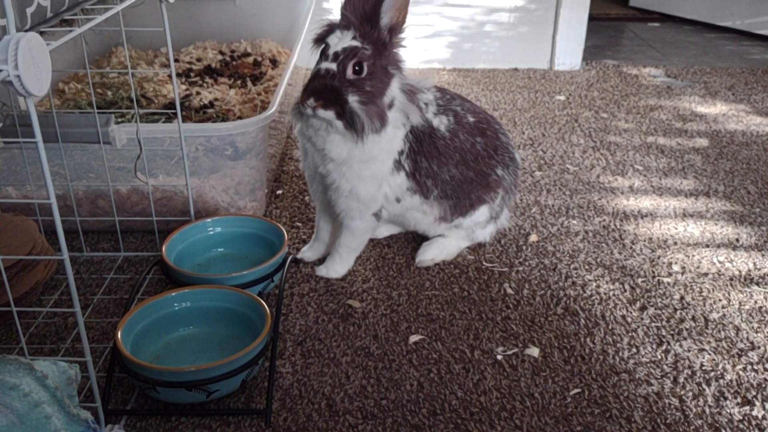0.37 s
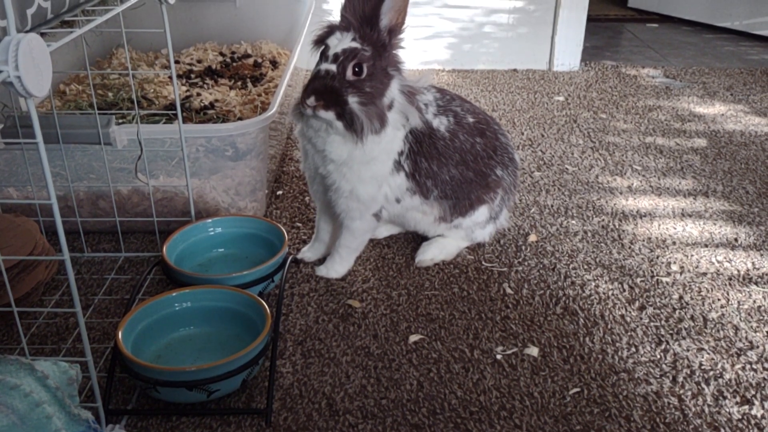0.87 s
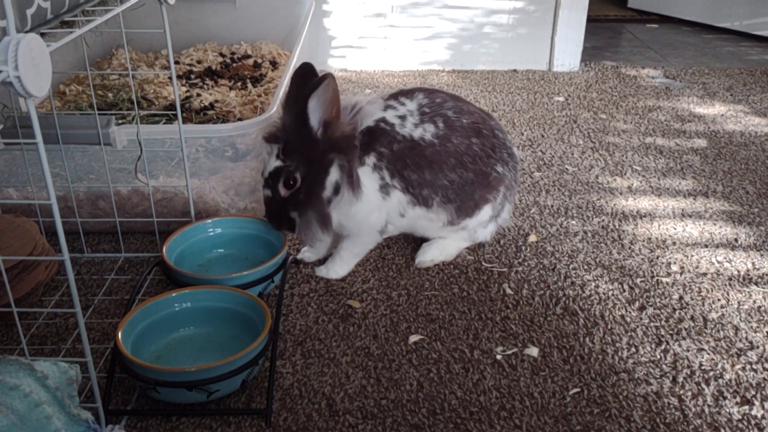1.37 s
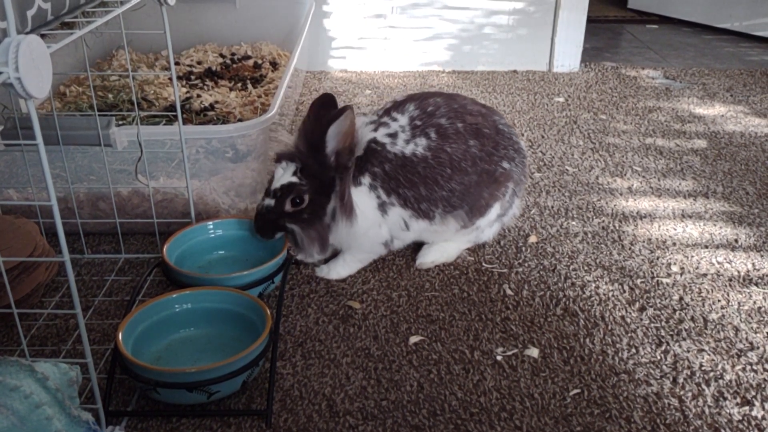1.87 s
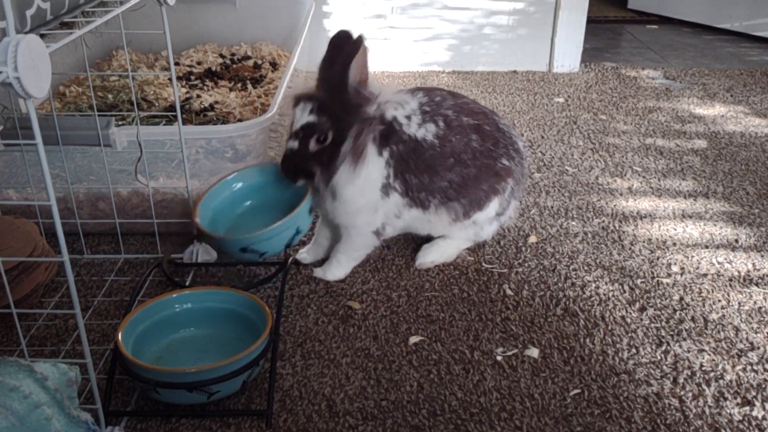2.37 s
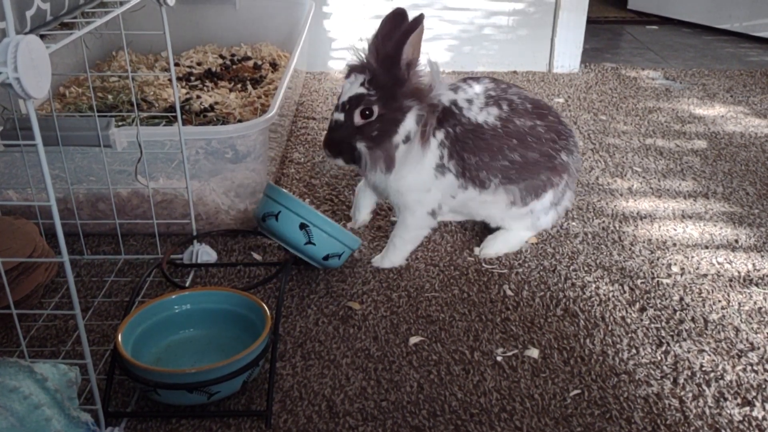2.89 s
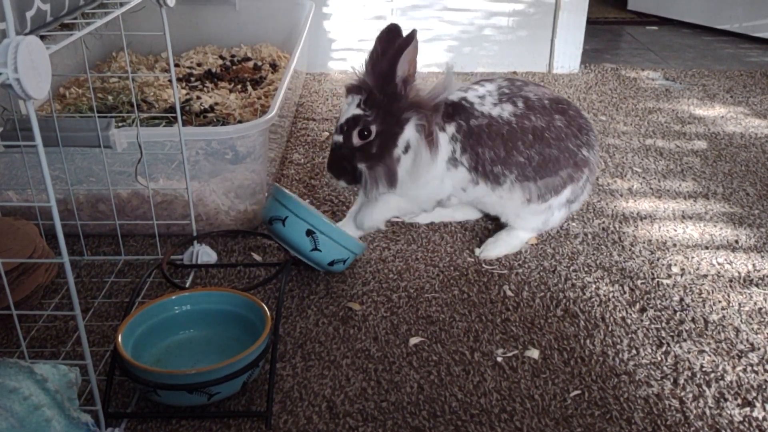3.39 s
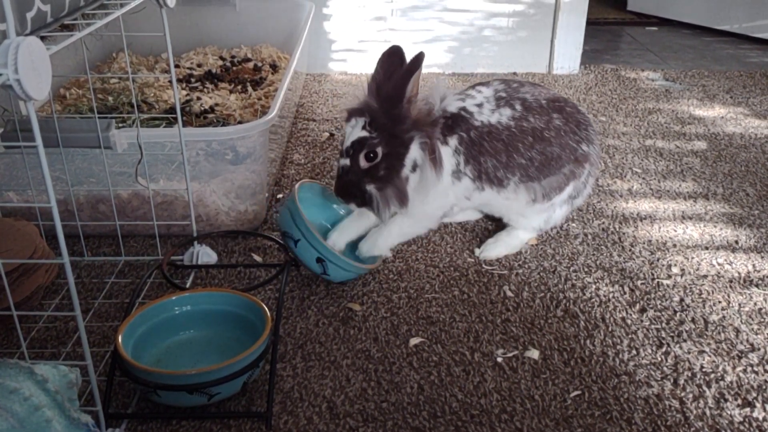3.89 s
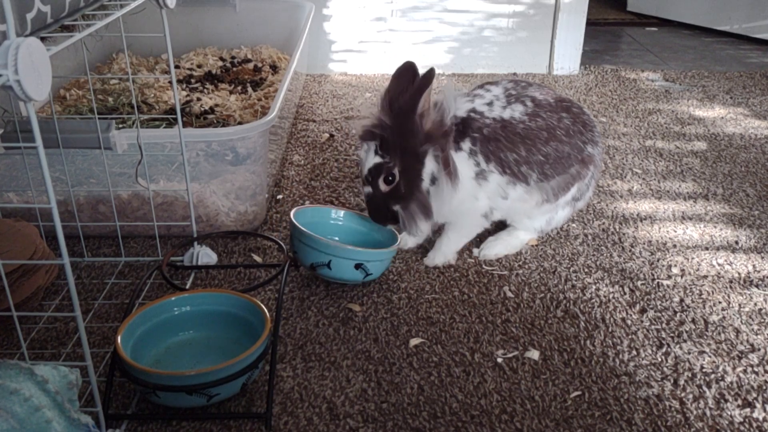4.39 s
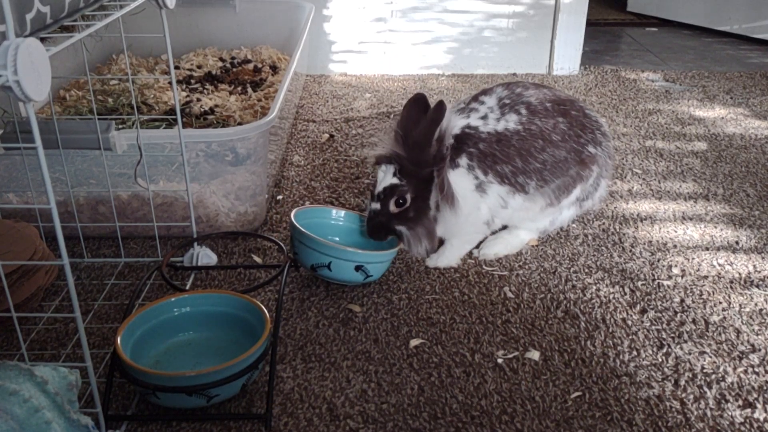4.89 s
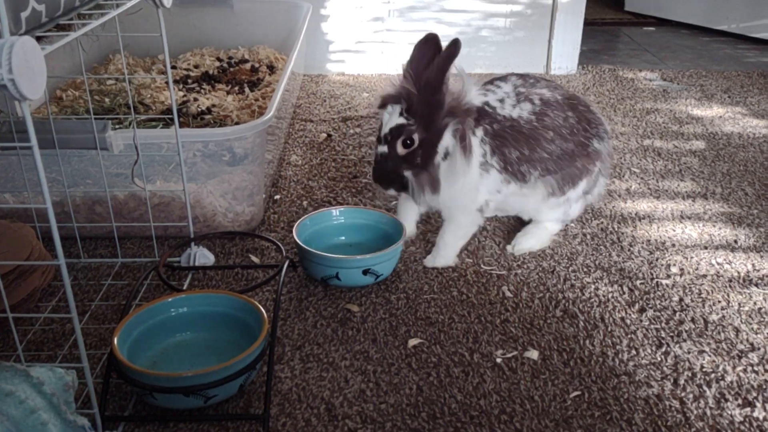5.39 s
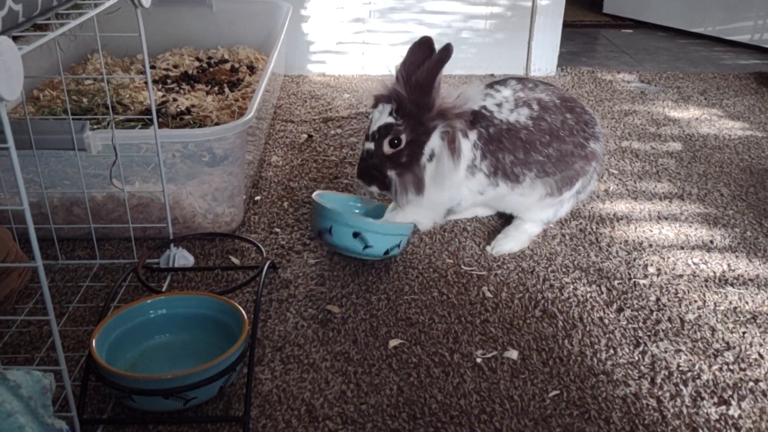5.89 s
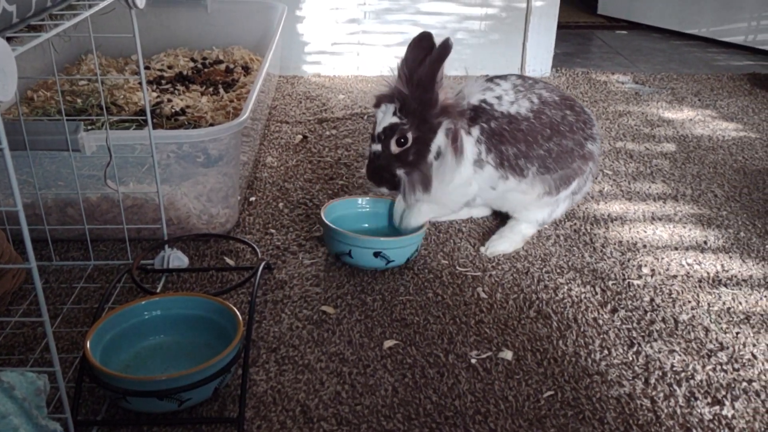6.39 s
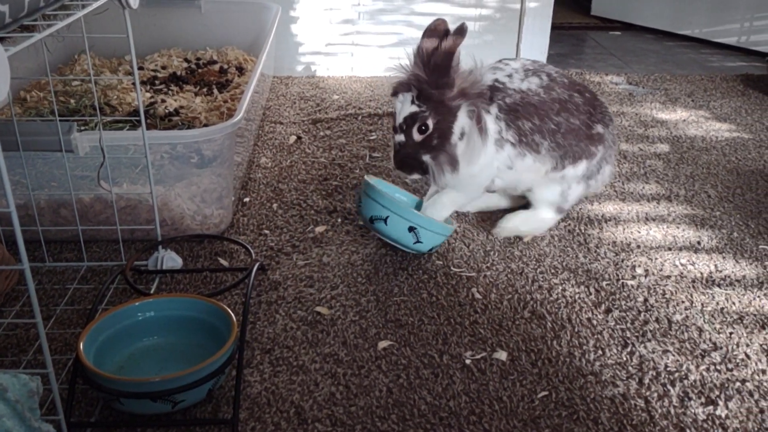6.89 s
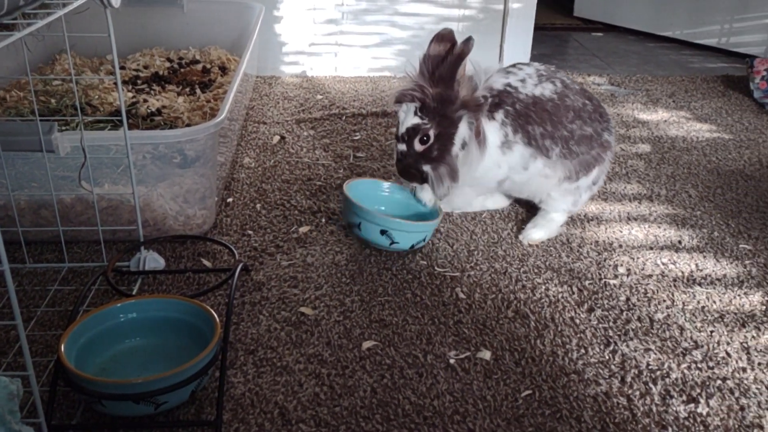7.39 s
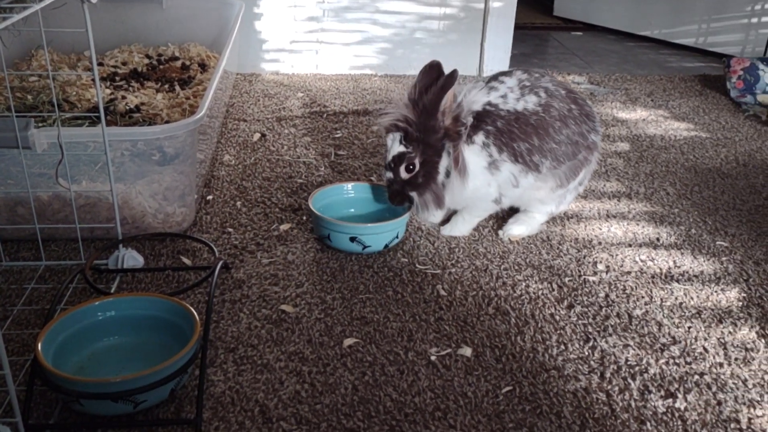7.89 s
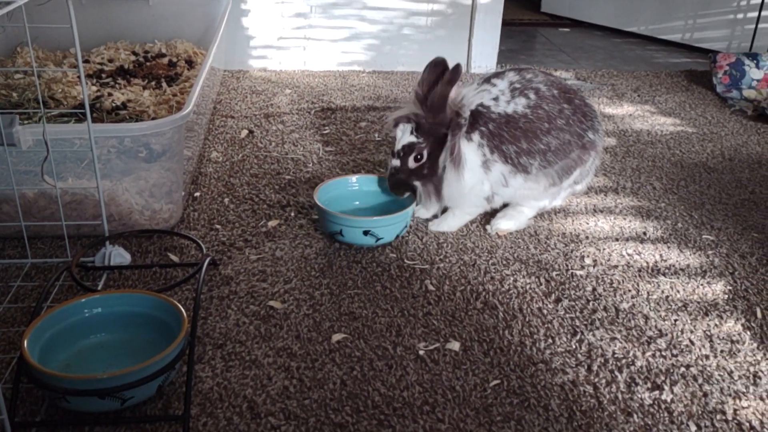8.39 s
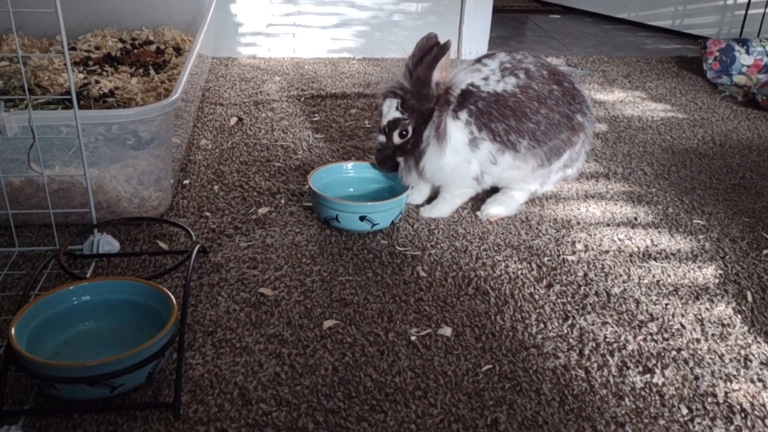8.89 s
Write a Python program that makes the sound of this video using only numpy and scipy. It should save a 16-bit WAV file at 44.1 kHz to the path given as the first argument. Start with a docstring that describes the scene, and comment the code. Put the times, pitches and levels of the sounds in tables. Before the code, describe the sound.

Soft handling rumble and faint wire rattles, then sharp ceramic-on-wire clanks, ringing clinks, and quiet taps and furry rustling on carpet.

```python
"""First a quiet room, a grip rumbling on a handheld microphone pair, fur rustling and wires being brushed.
Then a rabbit lifts a ceramic bowl off its wire stand, drops it against the wires and paws it over a carpet.
The bowl and wires are decaying resonances; thuds, fur and paws are shaped noise; a small room answers the knocks.
A hand half covers the left port, and fingers thump on the case as short pressure swings."""
import sys
import numpy as np
from scipy import signal
from scipy.fft import rfft, irfft, next_fast_len
from scipy.io import wavfile
from scipy.ndimage import uniform_filter1d, map_coordinates

SR = 44100
rng = np.random.default_rng(int(sys.argv[2]) if len(sys.argv) > 2 else 0)


def volts_from_db(level):
    """Convert decibel levels to linear amplitude ratios."""
    exponent = np.asarray(level, float) / 20
    return 10 ** exponent


def store_wav(level_fs):
    """Save 16-bit WAV to argv[1]."""
    pcm = np.round(np.clip(np.atleast_2d(level_fs), -1, 1) * 32767)
    wavfile.write(sys.argv[1], SR, pcm.T.astype(np.int16))


N = 397341
FAR_STAND_DB = -92  # wire clatter of a knock away from the stand


def unit(x):
    """Scales a sound to rms 1."""
    return x / np.sqrt(np.mean(x ** 2) + 1e-20)


def along(points, hz):
    """Reads a curve of (Hz, value) points on a log frequency axis."""
    point_hz, value = np.transpose(points)
    return np.interp(np.log(hz + 1), np.log(point_hz + 1), value)


def curves(rows, t=None):
    """Joins the rows into one smooth value per moment for each column after the time."""
    if t is None:
        t = np.arange(N) / SR
    start_s, *columns = np.transpose(rows)
    return [np.interp(t, start_s, column) for column in columns]


def wobble(rate):
    """A smooth random curve with rate knots a second."""
    knots = rng.standard_normal(int(N * rate / SR) + 4)
    return map_coordinates(knots, [np.arange(N) * rate / SR])


def filtered(x, response):
    """Multiplies the spectrum of x by a response that depends on frequency."""
    n = x.shape[-1]
    size = next_fast_len(n + 8192)  # spare room for the filter's tail
    return irfft(rfft(x, size) * response(np.fft.rfftfreq(size, 1 / SR)), size)[..., :n]


def coloured(x, spectrum):
    """Shapes x with a table of (Hz, dB)."""
    return filtered(x, lambda hz: volts_from_db(along(spectrum, hz)))


def noise(spectrum):
    """Two unrelated noises of one colour, rms 1 each."""
    pair = coloured(rng.standard_normal((2, N)), spectrum)
    return pair / pair.std(axis=1, keepdims=True)


def split(pan_db):
    """Left and right gains for a left-right difference, their mean 1."""
    return 2 / (1 + np.array([volts_from_db(-pan_db), volts_from_db(pan_db)]))


# how long the room echoes: pitch_hz, t60_s (time to fall by 60 dB)
ECHO_TIMES = [(200, 0.65), (1500, 0.17), (5000, 0.28), (12000, 0.1)]


def room(x, wet_db):
    """Adds a diffuse tail of fading noise, different at each port, to the direct sound."""
    hz, t, grains = signal.stft(rng.standard_normal((2, SR // 3)), SR, nperseg=256)
    fade = volts_from_db(-60 * t / along(ECHO_TIMES, hz)[:, None])
    tail = signal.istft(grains * fade, SR, nperseg=256)[1]
    tail = np.pad(tail / np.linalg.norm(tail[0]), ((0, 0), (130, 0)))  # the tail waits 3 ms
    wet = signal.fftconvolve(x[None], tail, axes=1)[:, :len(x)]
    return x + volts_from_db(np.reshape(wet_db, (-1, 1))) * wet


# colour of the room tone: pitch_hz, density_db (per Hz)
ROOM_TONE = [(80, -41), (150, -14.5), (300, -5), (356, -2), (420, -8), (600, -18), (1200, -21),
             (3000, -31.5), (6000, -120)]
# colour of a steady narrow hiss: pitch_hz, density_db (per Hz)
THIN_HISS_COLOUR = [(4600, -120), (5300, -4.5), (6000, 1), (6700, -5.5), (7600, -120)]
# strength of that hiss, one row for left and one for right: level_db
THIN_HISS_LEVELS = [
    [-93],
    [-83],
]


def background():
    """Low room tone and a thin hiss, both steady noise."""
    return volts_from_db(-79) * noise(ROOM_TONE) + volts_from_db(THIN_HISS_LEVELS) * noise(THIN_HISS_COLOUR)


# slips of the fingers on the case: start_s, level_db, pitch_hz, direction (push 1, pull -1)
FINGER_SLIPS = [(0.8784, -45, 190, -1), (0.894, -33, 138, 1), (0.918, -29, 107, -1),
                (1.2356, -41.5, 118, 1), (2.2787, -34, 145, -1), (2.3982, -44, 142, -1),
                (2.42, -43, 144.8, -1), (2.602, -47, 144, 1), (3.228, -37, 149, 1), (4.6056, -25, 354, 1),
                (4.63, -32.5, 290, 1), (4.7, -45.5, 135.2, -1), (4.8225, -39, 152, -1),
                (4.8574, -28.5, 181.4, 1), (4.993, -45.5, 190, 1), (5.104, -40, 133, 1),
                (5.1752, -40, 118, -1), (5.194, -40.5, 192.3, 1), (5.3155, -28, 146, 1),
                (5.3475, -20.5, 108, 1), (5.3537, -21, 95, -1), (5.367, -25.5, 123, -1),
                (5.3834, -28, 134, 1), (6.4902, -45, 310, 1), (6.5287, -44.5, 191, 1), (6.552, -37, 272, 1),
                (6.584, -40.5, 277, 1), (6.6175, -39.5, 290, 1), (6.649, -43, 233, 1),
                (6.6693, -42.5, 232, 1), (6.792, -30, 137, -1), (6.8345, -36, 132, -1),
                (6.8776, -43.5, 120, -1), (6.949, -42.5, 240, 1), (6.969, -43, 114, -1),
                (7.102, -41.5, 124, -1), (7.704, -52, 237, 1), (8.8897, -41.5, 325, -1)]
# the resting grip: start_s, rumble_db (before the 6 dB added below), left_minus_right_db
GRIP_RUMBLE = [(0.0, -68, 16), (0.6, -73.5, 12), (1.3, -72, 13.5), (2.2, -70.5, 11), (2.66, -66, 11),
               (3.26, -70.5, 13.5), (4.31, -78, 9), (4.62, -66, 10), (4.85, -74, 11.5), (5.24, -62.5, 14.5),
               (5.5, -71, 5), (5.7, -79.5, -1.5), (6.25, -81.5, 6), (6.37, -72, 6), (6.7, -65, -2),
               (6.95, -66.5, -0.5), (7.3, -72.5, 2.5), (8.05, -83.5, -0.5), (9.01, -80.5, -1)]
# colour of the grip rumble: pitch_hz, density_db (per Hz)
RUMBLE_COLOUR = [(15, -43), (25, -12.5), (81, 2), (130, -3), (274, -17.5), (309, -20.5), (382, -27.5),
                 (600, -32.5), (780, -48), (1320, -120)]


def fingers():
    """A slip is one pressure step that swings back and dies in a cycle or two; the grip rumbles beneath."""
    out, shifts, lead = np.zeros((2, N + SR)), 0, SR // 50
    t = (np.arange(SR // 10) - lead) / SR
    for start_s, level_db, hz, direction in FINGER_SLIPS:
        # quick slips are fingertips by the right port, slow ones the palm on the left
        pan_db = -20 if hz > 210 else 20 + (level_db + 45)
        turns = hz * t
        rise = np.exp(-(turns / 0.11) ** 2)
        swing = np.cos(2 * np.pi * turns) * np.exp(-1.2 * np.abs(turns))
        push = np.where(t < 0, rise, swing)
        sides = volts_from_db(level_db + np.minimum([pan_db, -pan_db], 0))[:, None]
        out[:, round(start_s * SR) - lead:][:, :len(t)] += np.sign(direction) * sides * push
        # the grip shifts around each slip, so the rumble swells there
        swell = np.exp(-((np.arange(N) / SR - start_s) / 0.03) ** 2)
        shifts = shifts + volts_from_db(-29.5) * sides * swell
    rumble_db, pan_db = curves(GRIP_RUMBLE)
    lumps = volts_from_db(1.5 * np.array([wobble(22), wobble(22)]) + 1.5 * wobble(5.3))
    rumble = unit(lumps * noise(RUMBLE_COLOUR))
    return out[:, :N] + (volts_from_db(rumble_db + 6) * split(pan_db) + shifts) * rumble


# resonances of the wire stand: pitch_hz, width_hz, level_db
WIRE_RESONANCES = [(236, 111, -12.5), (605, 310, -13), (974, 110, -6.5), (1401, 160, 1.5), (2030, 200, -4),
                   (2184, 200, 3.5), (2440, 1100, -4.5), (3670, 360, -7), (3550, 73, -3), (4220, 96, 2.5),
                   (5850, 170, -6), (6550, 100, -19), (6530, 750, -13.5), (7200, 460, -19.5),
                   (9800, 130, -54)]


def wires(f):
    """Response of the stand: broad resonances that ring only after they are struck."""
    total = 0
    for k, (centre, width, level_db) in enumerate(WIRE_RESONANCES):
        resonance = 1j * f * width / (centre * centre - f * f + 1j * f * width)
        total = total + (-1) ** k * volts_from_db(level_db) * resonance
    return total


# light touches on the stand: start_s, level_db (before the 5.5 dB taken off below), rustle_db (against the shake)
STAND_TOUCHES = [(0.089, -60.5, -7), (0.306, -65, 2.5), (0.564, -54, -4.5), (0.828, -56, 0.5),
                 (1.847, -56.5, -9), (2.033, -59.5, -11), (2.269, -56, -12), (2.966, -51.5, -31)]
# colour of fur, also used for scuffing: pitch_hz, density_db (per Hz)
FUR_COLOUR = [(1500, -120), (2400, -9.5), (4000, -7.5), (5500, -4.5), (6500, 1.5), (8000, -5.5),
              (8700, -12.5), (12000, -14.5), (16000, -14)]


def nudges():
    """A light touch shakes the wires for a moment with a short rustle."""
    out, t = np.zeros((2, N + SR)), np.arange(SR // 2) / SR
    for start_s, level_db, rustle_db in STAND_TOUCHES:
        shake = unit(filtered(rng.standard_normal(len(t)), wires))
        rustle = volts_from_db(rustle_db) * unit(coloured(rng.standard_normal(len(t)), FUR_COLOUR))
        envelope = volts_from_db(level_db - 5.5 - 60 * t / 0.22) * (1 - np.exp(-t / 0.01))
        out[:, round(start_s * SR):][:, :len(t)] += room((shake + rustle) * envelope, wet_db=-2.5)
    return out[:, :N]


# fur against the bowl: start_s, level_db (before the 4 dB left and 9 dB right added below)
FUR_RUSTLE = [(0.0, -93), (1.3, -98), (1.78, -95), (2.01, -80), (2.3, -93), (2.61, -72), (2.8, -83),
              (3.3, -79.5), (4.3, -81), (4.64, -83.5), (5.07, -75.5), (5.3, -82.5), (5.7, -78), (6.25, -83),
              (7.13, -83), (7.45, -75.5), (7.73, -82.5), (8.16, -72), (8.45, -76.5), (8.8, -80.5),
              (9.01, -66.5)]
# paws dragging on the pile: middle_s, half_length_s, level_db
PAW_DRAGS = [(0.87, 0.11, -73), (1.98, 0.14, -69.5), (2.63, 0.033, -55), (2.93, 0.06, -66.5),
             (3.2, 0.28, -72.5), (4.04, 0.16, -70.5), (4.5, 0.22, -69), (5.07, 0.21, -74),
             (5.42, 0.098, -76.5), (6.55, 0.069, -77.5), (9.01, .12, -72.5)]
# colour of the paws: pitch_hz, density_db (per Hz)
PAW_COLOUR = [(200, -120), (400, 6.5), (1000, 1), (2300, 0), (4000, 2.5), (6000, -120)]


def scuffing():
    """Fur brushes the bowl and paws drag on the pile, both as noise in uneven grains."""
    fur_db, = curves(FUR_RUSTLE)
    t = np.arange(N) / SR
    drags = sum(volts_from_db(db) * np.exp(-((t - middle) / half) ** 2) for middle, half, db in PAW_DRAGS)
    fur_grains = volts_from_db(fur_db + np.array([[4], [9]]) + wobble(30) + 1.8 * wobble(280))
    paw_grains = volts_from_db(1.5 * wobble(43) + 2.6 * wobble(180))
    return fur_grains * noise(FUR_COLOUR) + drags * paw_grains * noise(PAW_COLOUR)


# the bowl's weight thuds on the floor: start_s, level_db
FLOOR_THUDS = [(2.55, -41), (2.652, -42), (2.70, -45.5), (2.76, -52)]
# colour of a thud: pitch_hz, density_db (per Hz)
THUD_COLOUR = [(40, -120), (70, -5), (200, 2), (350, -6), (700, -16), (1200, -120)]


def landings():
    """Each thud is a dull burst of noise that swells fast and falls by 60 dB in 0.15 s."""
    t, shape = np.arange(N) / SR, 0
    for start_s, level_db in FLOOR_THUDS:
        since = np.maximum(t - start_s, 0)
        shape = shape + volts_from_db(level_db - 60 * since / 0.15) * (1 - np.exp(-since / 0.003))
    return shape * noise(THUD_COLOUR)[0]


# the bowl hits the stand: start_s, foot_db, low_rim_db, high_rim_db, clatter_db
STAND_HITS = [(1.7573, -74, -87, -72, -88), (1.955, -63, -89, -77, -62), (2.1305, -68, -87, -87, -69),
              (2.2624, -57, -92.5, -84.5, -73.5), (2.4204, -66, -78, -77.5, -60.5),
              (2.4509, -39.5, -75, -62, -45), (2.5032, -49, -71, -61, -73), (2.5334, -14.5, -44, -52, -34),
              (2.5548, -14.5, -37, -51, -32), (2.6519, -14, -32.5, -50, -33),
              (2.6988, -38.5, -40.5, -65.5, -34.5), (3.2081, -43, -59, -44, -67),
              (3.3446, -75, -66.5, -57, -70), (3.4237, -56.5, -78, -59.5, -73),
              (3.493, -44.5, -57, -49, -65.5), (3.5234, -51, -43, -52.5, -50.5),
              (3.5544, -54, -49, -49.5, -61), (3.6061, -56, -39.5, -67, -48), (3.706, -54, -88, -49, -73),
              (3.7743, -49, -70, -49, -68.5), (3.8434, -67, -56.5, -75, -50.5),
              (3.9932, -36, -75.5, -68, -44.5), (4.0098, -33, -81, -61, -75),
              (4.0374, -44.5, -74.5, -49.5, -81), (4.103, -34, -82, -59.5, -46.5),
              (4.1354, -37, -60, -43.5, -74), (4.1586, -39, -62, -53.5, -51),
              (4.2798, -61, -62, -57.5, -82), (4.4049, -13, -38.5, -33.5, -31.5),
              (4.4113, -12, -31, -22, -29), (4.4479, -21, -55, -28, -38),
              (4.5024, -34.5, -35.5, -47.5, -49), (4.8374, -74.5, -59.5, -63.5, -71),
              (5.0878, -53.5, -71, -92, -68.5)]
# claws and teeth tap the bowl on the carpet: start_s, foot_db, low_rim_db, middle_rim_db, high_rim_db
CARPET_TAPS = [(5.1964, -65, -70, -61.5, -52.5), (5.5442, -68, -68, -62, -66),
               (5.7167, -40.5, -68, -72, -83), (5.7659, -53.5, -62.5, -51, -59.5),
               (5.8829, -32.5, -69, -61, -60), (5.9893, -38, -72, -62, -67),
               (6.0876, -57, -63.5, -62.5, -61), (6.3577, -37, -92, -79, -63), (6.3737, -54, -94, -64, -57),
               (6.4001, -34.5, -69, -66, -62), (6.6947, -61, -62, -61, -50),
               (6.8698, -60.5, -68.5, -87, -87.5), (7.1624, -79.5, -80, -60.5, -65),
               (7.2934, -63, -78, -63.5, -60), (7.3244, -49, -76, -84, -80), (7.3456, -63, -79, -70, -64),
               (7.3676, -64, -76, -59, -55), (7.385, -54, -85, -65, -68), (7.4447, -56, -80, -55, -55),
               (7.477, -64, -56.5, -50.5, -50), (7.9554, -74, -65.5, -73, -55.5),
               (7.9964, -75, -74, -74, -59), (8.1844, -73, -65.5, -66, -50.5),
               (8.3674, -77, -74, -69.5, -54.5), (8.4986, -65, -82, -77, -72),
               (8.606, -76.5, -75.5, -61.5, -60)]


def blows(count=18):
    """Lists all blows as (s, foot, low, middle, high rim, clatter dB); faint rocking ones fall at random."""
    hits = []
    for start_s, foot, low, high, clatter in STAND_HITS:
        middle = low + 0.99 * (high - low) - 6.5  # mostly follows the high rim
        hits.append((start_s, foot, low, middle, high, clatter))
    slots = (np.arange(count) + rng.random(count)) / count
    rock_s = 4.9 + slots * (7.5 - 4.9)  # the bowl rocks on the pile from 4.9 to 7.5 s
    usual_db = [-76, -78, -78.5, -70.5]  # foot, low, middle, high rim
    rocks = np.c_[rock_s, usual_db + 5 * rng.standard_normal((count, 4))]
    return hits + [(*tap, FAR_STAND_DB) for tap in [*CARPET_TAPS, *rocks]]


# moments when paw, teeth or pile hold the bowl, or the ring swells back a little where the value is negative:
# start_s, ring_lost_db
HOLDS = [(2.79, 13), (3.603, 17.5), (3.761, -2), (4.475, 6.5), (4.872, 11.5), (6.239, 6.5), (7.82, -4),
         (7.975, 18), (8.06, 1.5), (8.203, 19), (8.389, 19)]


def ring_lost():
    """Held ceramic loses its ring within 15 ms, and at a few moments the ring swells back a little; the level
    also wavers as the bowl turns its tones to and fro."""
    t = np.arange(N + SR) / SR
    lost_db = sum(db * np.clip((t - start_s) / 0.015, 0, 1) for start_s, db in HOLDS)
    return lost_db + np.pad(1.5 * wobble(25), (0, SR))


# tones of the bowl, one table for each way it bends: pitch_hz, level_db, t60_s (time to fall by 60 dB)
FOOT_TONES = [(4200, -4, .085), (4238, -4, .085), (4330, -12, .08), (7012, -1.5, .09), (9078, -21, .08),
              (10295, -23, .09), (12450, -35, .1), (13300, -33, .1), (14015, -33, .1)]
LOW_RIM_TONES = [(1427, 0, .85)]
MIDDLE_RIM_TONES = [(3176, 0, .4)]
HIGH_RIM_TONES = [(5346, 0, .25), (7957, -6, .17), (10295, -19, .12), (10925, -15, .12), (13300, -17, .12),
                  (14243, -16, .11), (15350, -16, .09)]
# colour of wire grinding on glaze: pitch_hz, density_db (per Hz)
GRIND_COLOUR = [(2000, -120), (3300, -7), (4300, 4.5), (5500, -5), (6600, -0.5), (7800, -5.5), (8500, -20),
                (9500, -18.5), (10500, -42), (16000, -50)]


def bowl():
    """Each blow rings four families of decaying tones at their own strengths and shakes the wires."""
    out, t = np.zeros((2, N + SR)), np.arange(SR) / SR
    hits = blows()
    onset = 1 - np.exp(-t / 0.00052)
    families = [[volts_from_db(db - 60 * t / t60) * np.exp(2j * np.pi * hz * t) * onset for hz, db, t60 in tones]
                for tones in (FOOT_TONES, LOW_RIM_TONES, MIDDLE_RIM_TONES, HIGH_RIM_TONES)]
    lost_db = ring_lost()
    short = t[:SR // 3]
    spikes, grit, jolts, crack = rng.standard_normal((len(hits), 4, len(short))).transpose(1, 0, 2)
    # cubed noise is spiky: the wires bounce on the glaze
    chatters = filtered(volts_from_db(9.5 - 60 * short / 0.051) * spikes ** 3, wires)
    grinds = volts_from_db(-60 * short / 0.023) * unit(coloured(grit, GRIND_COLOUR))
    ticks = volts_from_db(-60 * short / 0.0013) * uniform_filter1d(crack, size=3)
    for (start_s, *levels, clatter_db), chatter, grind, jolt, tick in zip(hits, chatters, grinds, jolts, ticks):
        at = round(start_s * SR)
        # rim tones get no room tail: each port hears them steady, at its own phase
        rims = 0
        for level_db, family in zip(levels[1:], families[1:]):
            for mode in family:
                phases = np.exp(2j * np.pi * rng.random((2, 1)))
                rims = rims + volts_from_db(level_db + rng.normal(0, 1)) * (mode * phases).imag
        held = volts_from_db(lost_db[at] - lost_db[at:][:len(t)])
        out[:, at:][:, :len(t)] += rims * held * np.cos(np.pi * t / 2) ** 0.5  # silent after one second
        foot = sum(volts_from_db(rng.normal(0, 0.73)) * mode[:len(short)] * np.exp(2j * np.pi * rng.random())
                   for mode in families[0])
        # a foot that lands on the wires is shaken and choked by them
        pressed = min(volts_from_db(clatter_db - levels[0] + 14), 1)
        shaken = (foot * np.exp(0.08j * pressed * np.cumsum(jolt))).imag
        choked = shaken * volts_from_db(-150 * pressed * short)
        contact = volts_from_db(levels[0]) * ((1 - 0.67 * pressed) * choked + volts_from_db(-6) * pressed * grind)
        contact = contact + volts_from_db(clatter_db) * chatter
        contact = contact + (volts_from_db(levels[0] - 22.5) + volts_from_db(levels[3] + 5)) * tick
        wet_db = [-4, -2] if clatter_db > FAR_STAND_DB else [-7, -6]
        out[:, at:][:, :len(short)] += room(contact, wet_db)
    return out[:, :N]


# how much of the left port is under the hand: start_s, share (0 to 1)
HAND_SHARE = [(0, 0.9), (2.3, 1), (2.45, 1), (5.4, 1), (5.55, 0.31), (6.45, 0.26), (7.44, 0.017),
              (8.7, 0.017), (9.01, 0.13)]
# left port under the hand: pitch_hz, gain_db
COVERED_PORT = [(60, 4), (130, 8), (290, -3), (640, -2), (1410, -14.5), (3100, -27.5), (6820, -73.5),
                (15000, -15.5)]
# left port free: pitch_hz, gain_db
FREE_PORT = [(200, 2), (2500, 3), (4400, 1.5), (6500, -4), (8500, 5), (11000, 18), (15000, 10)]


def hand_over_port(pair):
    """The more the hand covers the left port, the more treble it loses."""
    hz, t, left = signal.stft(pair[0], SR, nperseg=512)
    share = np.clip(curves(HAND_SHARE, t)[0], 0, 1)
    gain_db = share * along(COVERED_PORT, hz)[:, None] + (1 - share) * along(FREE_PORT, hz)[:, None]
    return np.array([signal.istft(left * volts_from_db(gain_db), SR, nperseg=512)[1][:N], pair[1]])


def scene():
    """Airborne sound passes the ports; the fingers reach the capsules through the case."""
    airborne = background() + nudges() + scuffing() + landings() + bowl()
    return hand_over_port(airborne) + fingers()


# response of the capsules: pitch_hz, gain_db
CAPSULE_RESPONSE = [(15, -25), (40, -4), (70, 0.5), (9000, 2.5), (11000, -10.5), (16000, -12.5)]
# colour of the microphones' own hiss: pitch_hz, density_db (per Hz)
SELF_NOISE = [(100, 0), (1000, 4), (5000, -3), (9000, -9), (16000, -9)]


def capsules(dry):
    """The capsules lose the deepest bass and the top treble and add their own hiss."""
    return coloured(dry, CAPSULE_RESPONSE) + volts_from_db(-77) * noise(SELF_NOISE)


def roll_off(x):
    """The treble ends steeply here."""
    return signal.sosfilt(signal.butter(12, 15900, fs=SR, output="sos"), x)


def record(dry):
    """The microphone pair picks up the scene, giving the finished mix."""
    mix = capsules(dry)
    return roll_off(mix)


dry = scene()
out = record(dry)
store_wav(out)
```